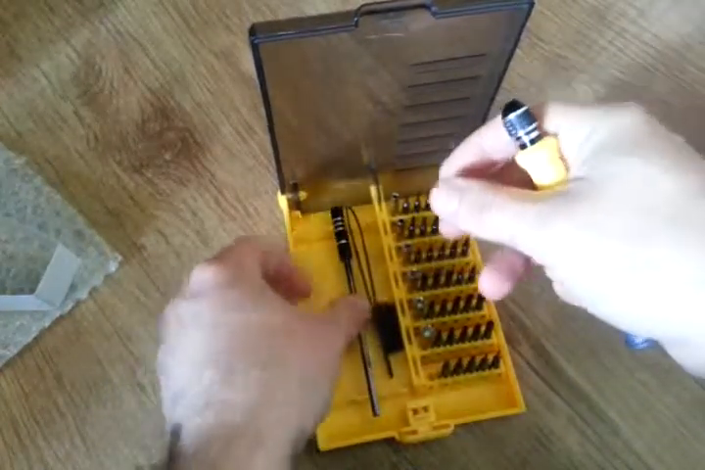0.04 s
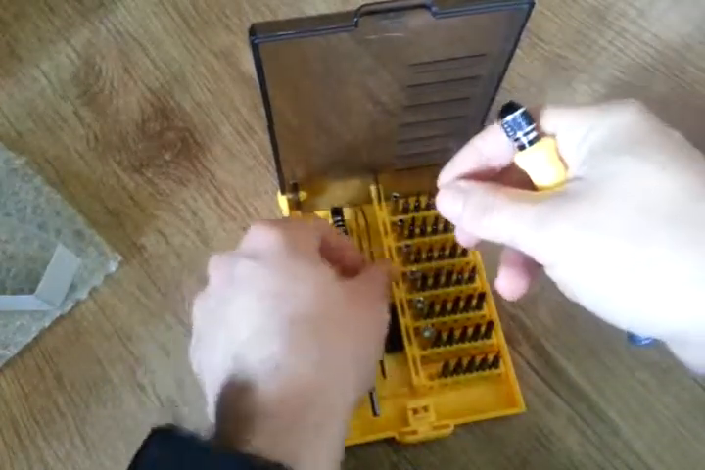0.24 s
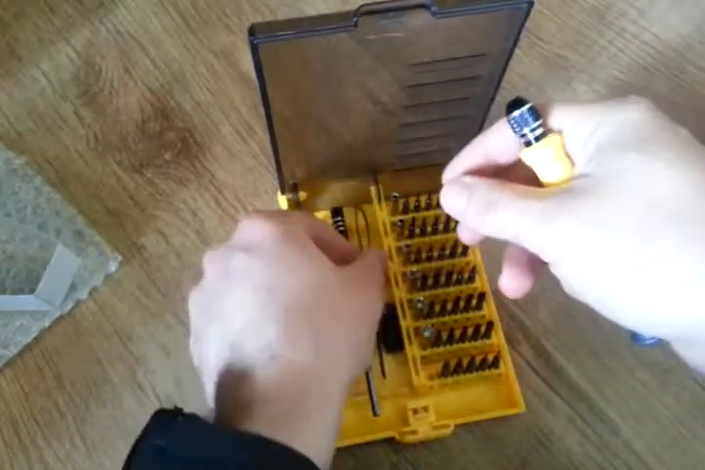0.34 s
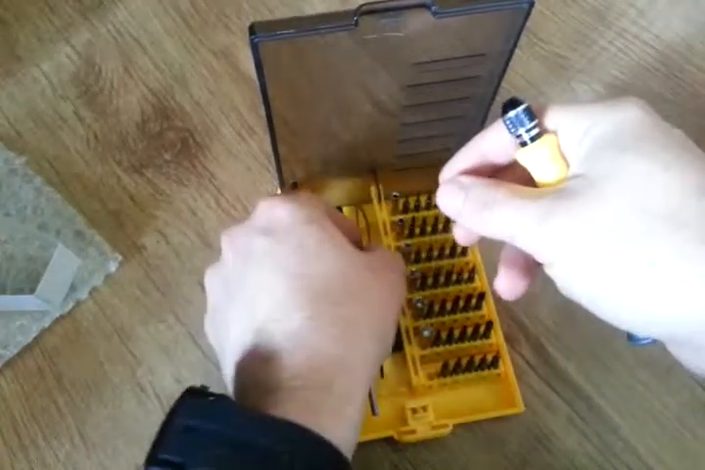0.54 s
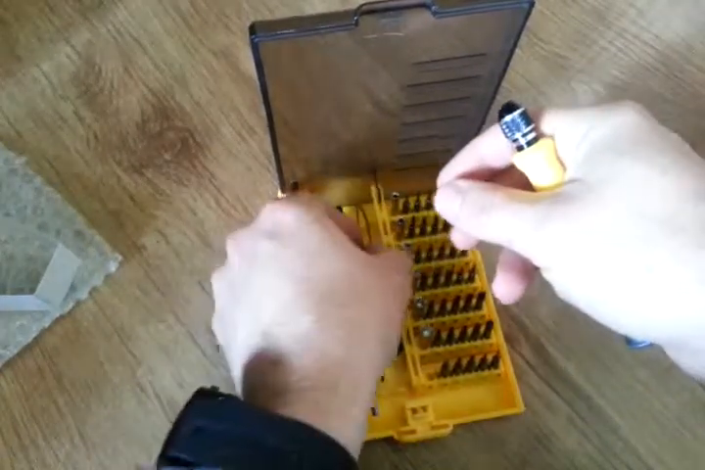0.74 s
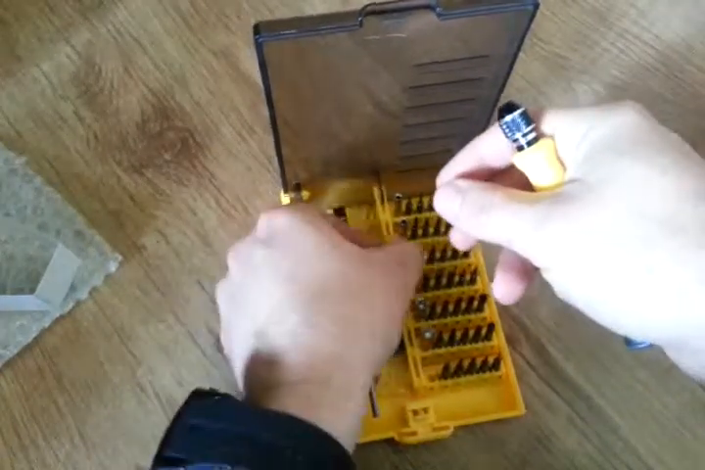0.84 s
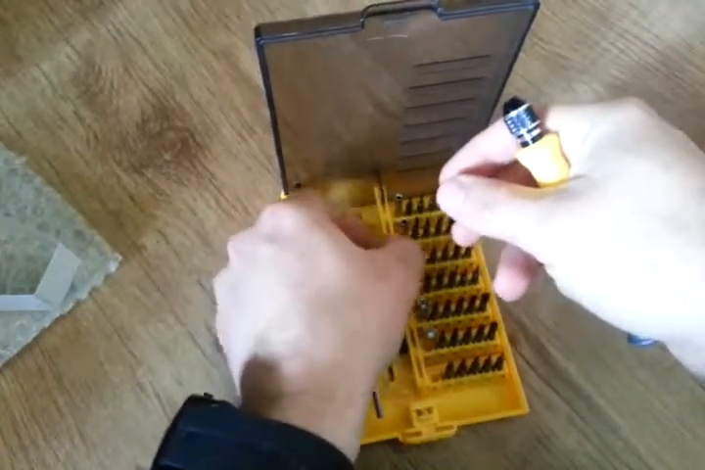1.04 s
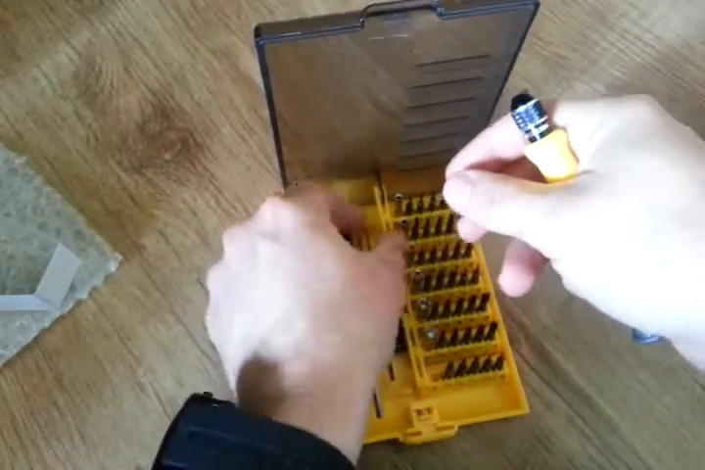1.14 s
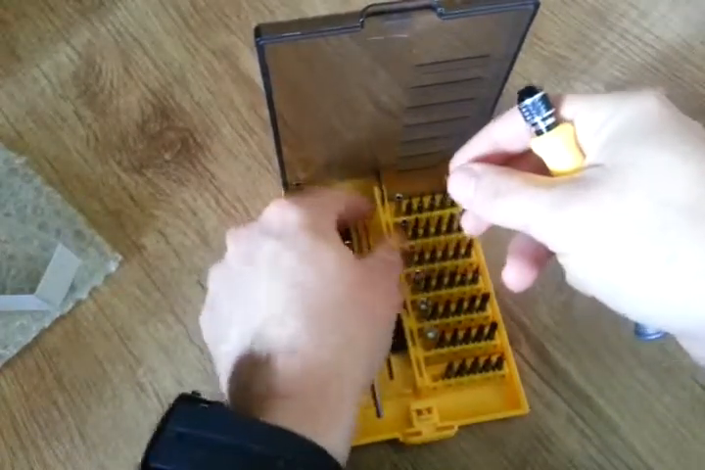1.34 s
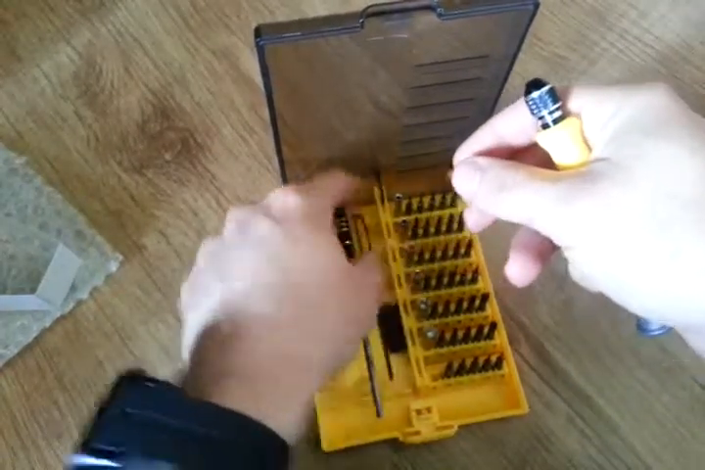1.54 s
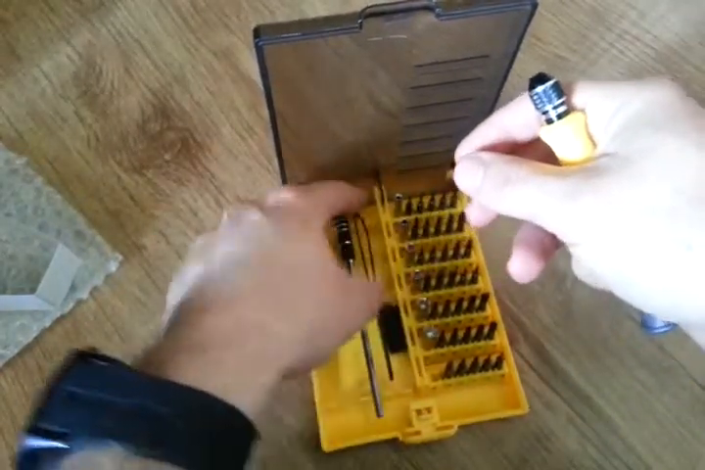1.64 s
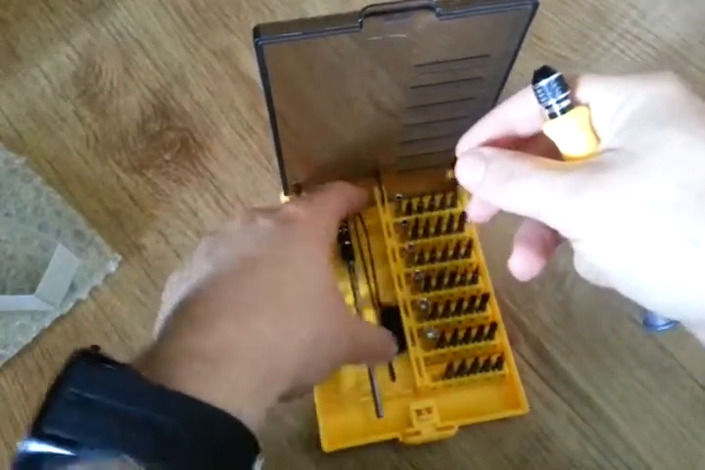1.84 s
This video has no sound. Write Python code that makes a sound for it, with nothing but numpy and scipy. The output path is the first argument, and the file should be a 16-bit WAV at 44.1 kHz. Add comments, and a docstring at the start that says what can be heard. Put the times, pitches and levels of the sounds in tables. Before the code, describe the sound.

Hard plastic clicks from a small steel tool being worked out of its case, close up. After near silence, a sharp double snap at 0.25 s, then light scrapes and small clicks until 0.8. The loudest clack comes at 0.88, followed by scattered snaps to 1.4. Squeaky rubs at 1.3 and 1.63, then soft scraping and faint dry camera ticks over quiet room hiss.

```python
"""In a quiet room, fingers work a steel bit holder out of a hard plastic case on a wooden table, close to a camera.
Parts click against the case: a short snap and crack, then ringing modes and a noisy rattle.
They scrape along it as dense random slips in the case's colour, at times singing as narrow bands of noise.
Faint dry sine ticks, probably the lens focusing, sound near the end over filtered-noise room tone and hiss."""
import sys
import numpy as np
from scipy import signal
from scipy.fft import rfft, irfft, next_fast_len
from scipy.io import wavfile
from scipy.ndimage import uniform_filter1d

SR = 44100
rng = np.random.default_rng(int(sys.argv[2]) if len(sys.argv) > 2 else 0)


def store_pcm(level_fs):
    """Save levels as 16-bit WAV."""
    pcm = np.round(np.clip(level_fs, -1, 1) * 32767).astype(np.int16)
    wavfile.write(sys.argv[1], SR, np.atleast_2d(pcm).T)


N = 83790

# ringing modes of the plastic case: mode_hz [Hz], level_db [dB], t60_s [s]
CASE_MODES = [(275, 0, .1), (410, -1, .07), (716, -3, .07), (901, -4, .07), (1225, -3, .06),
              (1423, -5, .06), (1625, -5, .06), (1953, -5, .06), (2124, -4, .06), (2480, -5, .06),
              (2824, -4, .06), (3330, -5, .06), (3750, -7, .06), (4450, -3, .05)]
# broad colour that the case radiates: freq_hz [Hz], level_db [dB]
CASE_COLOUR = [(100, -45), (190, -24), (270, 0), (330, -3), (650, 2), (1200, -3), (1700, -5), (2700, -4),
               (4700, -2), (5600, -7), (9500, -13), (11000, -21), (14500, -22)]


def amp(db):
    """dB to gain."""
    return 10 ** (np.asarray(db) / 20)


def unit(x):
    """Scaled to rms 1."""
    return x / np.sqrt(np.mean(x ** 2) + 1e-20)


def along(points, hz):
    """Values between (Hz, value) points, on a log frequency axis."""
    point_hz, values = np.transpose(points)
    return np.interp(np.log(hz + 1), np.log(point_hz + 1), values)


def filtered(x, response):
    """x with its spectrum multiplied by a response of frequency."""
    length = x.shape[-1]
    padded = next_fast_len(length + 4096)
    spectrum = rfft(x, padded) * response(np.fft.rfftfreq(padded, 1 / SR))
    return irfft(spectrum, padded)[..., :length]


def add(out, start_s, x):
    """Mix x in at a time."""
    start = max(round(start_s * SR), 0)
    out[:, start:start + x.shape[-1]] += x[:, :N - start]


def wide(pair):
    """One sound at two ports: a shared part, and a part of opposite sign that grows with frequency."""
    # unshared over shared part: freq_hz [Hz], ratio [gain]
    spread = [(250, .15), (600, .3), (1200, .55), (3000, .6), (12000, 1.1)]
    side = filtered(pair[1], lambda hz: along(spread, hz))
    return np.array([pair[0] + side, pair[0] - side])


def shelf_db(hz, bass_db, treble_db):
    """How much more or less a contact excites the low and the high end."""
    bass_hz, treble_hz = 900, 5500
    bass = bass_db / (1 + (hz / bass_hz) ** 4)
    treble = treble_db / (1 + (treble_hz / (hz + 1)) ** 6)
    return bass + treble


def peak_db(hz, centre_hz, height_db):
    """A bell-shaped boost on a log frequency axis."""
    width = .22  # in natural-log frequency
    return height_db * np.exp(-(np.log((hz + 1) / centre_hz) / width) ** 2)


def air():
    """Room tone and microphone hiss: coloured noise, more alike left and right in some bands than others."""
    # colour of the air: freq_hz [Hz], level_db [dB]
    air_colour = [(20, -23), (60, -11), (150, -2), (200, -2), (280, -5), (420, -5), (700, -11), (1500, -14),
                  (4500, -17), (6200, -22), (10000, -20), (14500, -20)]
    # left-right likeness: freq_hz [Hz], correlation [-1 to 1]
    likeness = [(60, .1), (300, .4), (1000, .2), (5000, .02)]
    mid_db, hiss_top_hz = -58, 14600

    def mid_side_response(hz):
        turn = np.arccos(np.clip(along(likeness, hz), -1, 1)) / 2
        colour = amp(along(air_colour, hz)) * (hz < hiss_top_hz)
        return colour * [np.cos(turn), np.sin(turn)]

    mid, side = filtered(rng.standard_normal((2, N)), mid_side_response)
    return amp(mid_db) * np.array([mid + side, mid - side]) / np.std(mid)


def room(x):
    """Reverberation as decaying noise: each frequency of the room's answer dies at its own speed."""
    # reverberation time: freq_hz [Hz], t60_s [s]
    room_t60 = [(200, .4), (1400, .3), (4000, .28), (10000, .22)]
    hz, t, grid = signal.stft(rng.standard_normal((2, SR // 2)), SR, nperseg=256)
    decay = amp(-60 * t / along(room_t60, hz)[:, None])
    tail = signal.istft(grid * decay, SR, nperseg=256)[1]
    tail = tail / np.linalg.norm(tail[0])
    delayed = np.pad(x.mean(axis=0), (200, 0))[None]  # pre-delay in samples
    return signal.fftconvolve(delayed, tail, axes=1)[:, :N]


def lens():
    """Tiny dry ticks, each a fast-dying sine, louder at the right port."""
    # ticks: start_s [s], level_db [dB, midway between the ports]
    ticks = [(1.5454, -44), (1.5788, -43), (1.6791, -42), (1.7449, -48), (1.7779, -49), (1.8113, -45),
             (1.8457, -40)]
    tick_hz, t60_s, right_over_left_db = 3200, .006, 4
    out, t = np.zeros((2, N)), np.arange(SR // 50) / SR
    pan = amp([[-right_over_left_db / 2], [right_over_left_db / 2]])
    for start_s, level_db in ticks:
        tick = amp(level_db - 60 * t / t60_s) * np.sin(2 * np.pi * tick_hz * t)
        add(out, start_s, tick * pan)
    return out


def sings():
    """A rubbed bit sings on one resonance: narrow noise, swelling and fading."""
    # sung notes: peak_s [s], level_db [dB rms at the peak], fall_s [s per 20 dB], pitch_hz [Hz]
    sung_notes = [(1.321, -45, .03, 1870), (1.322, -43, .02, 3350), (1.331, -45, .03, 3700),
                  (1.630, -37, .015, 3760), (1.637, -42, .02, 1400)]
    width_hz, rise_s = 300, .007  # width at half amplitude, time for a 20 dB rise
    out, t = np.zeros((2, N)), np.arange(-SR // 10, SR // 10) / SR
    for peak_s, level_db, fall_s, pitch_hz in sung_notes:
        noise = rng.standard_normal((2, len(t)))
        tone = filtered(noise, lambda hz: 1 / (1 + (2 * (hz - pitch_hz) / width_hz) ** 2))
        swell = amp(level_db - 20 * np.maximum(-t / rise_s, t / fall_s))
        add(out, peak_s + t[0], swell * wide(unit(tone)))
    return out


def rub_colour(hz, centre_hz, bass_db, treble_db):
    """The case's colour and modes, with a broad peak where the rubbing is centred."""
    modes_db = 8
    # shorter ringing means a broader resonance
    modes = sum(amp(level_db) / (1 + ((hz - mode_hz) * t60_s / 3) ** 2)
                for mode_hz, level_db, t60_s in CASE_MODES)
    colour_db = along(CASE_COLOUR, hz) + peak_db(hz, centre_hz, 7) + shelf_db(hz, bass_db, treble_db)
    return amp(colour_db) * (1 + amp(modes_db) * modes)


def scrapes():
    """Dense slips of uneven size through the case's colour, swelling and fading."""
    # scrapes: peak_s [s], level_db [dB rms at the peak], rise_s and fall_s [s per 20 dB],
    # centre_hz [Hz], bass_db [dB], treble_db [dB]
    strokes = [(.315, -46, .06, .06, 2500, 0, -3), (.44, -43, .03, .06, 3100, 8, -6),
               (.463, -38, .04, .04, 3500, 7, -6), (.525, -47, .04, .08, 3000, 4, -3),
               (.556, -41, .025, .05, 1500, 0, 0), (.715, -52, .06, .05, 1800, 9, -6),
               (.76, -41, .012, .05, 2600, 3, -3), (.795, -41, .03, .03, 2500, -2, 8),
               (.83, -48, .05, .08, 3000, 0, -3), (1.255, -44, .04, .045, 3500, 2, 3),
               (1.321, -37, .005, .025, 4300, -3, 6), (1.45, -49, .06, .06, 2700, -2, -3),
               (1.495, -49, .04, .06, 2200, 5, -3), (1.613, -47, .06, .03, 3500, -2, 0),
               (1.629, -36, .012, .04, 5200, -6, -1), (1.716, -48, .025, .025, 6500, -6, 8),
               (1.79, -55, .15, .15, 3000, 8, 0), (1.885, -48, .03, .04, 3000, 6, -3)]
    slips_per_s, slip_spread_db = 12000, 2
    uneven_db, uneven_s = 2, .004  # wander of the slip size and its smoothing time
    out, t = np.zeros((2, N)), np.arange(-SR // 5, SR // 5) / SR
    for peak_s, level_db, rise_s, fall_s, centre_hz, bass_db, treble_db in strokes:
        slips = rng.random(len(t)) < slips_per_s / SR
        sizes = amp(slip_spread_db * rng.standard_normal(len(t)))
        wander = unit(uniform_filter1d(rng.standard_normal(len(t)), round(uneven_s * SR)))
        grains = slips * sizes * amp(uneven_db * wander) * rng.standard_normal((2, len(t)))
        rub = filtered(grains, lambda hz: rub_colour(hz, centre_hz, bass_db, treble_db))
        swell = amp(level_db - 20 * np.maximum(-t / rise_s, t / fall_s))
        add(out, peak_s + t[0], swell * wide(unit(rub)))
    return out


def case_ring(t, bass_db, treble_db):
    """Decaying sines at the case's modes, struck at random strengths and phases at each port."""
    rise_cycles, scatter_db = .7, 3
    hz, level_db, t60_s = np.transpose(CASE_MODES)[:, :, None]
    shape = (2, len(CASE_MODES), 1)
    gains_db = level_db + scatter_db * rng.standard_normal(shape) + shelf_db(hz, bass_db, treble_db)
    phase = 2 * np.pi * rng.random(shape)
    envelope = amp(gains_db - 60 * t / t60_s) * (1 - np.exp(-t * hz / rise_cycles))
    return np.sum(envelope * np.sin(2 * np.pi * hz * t + phase), axis=1)


def case_noise(t, snap_hz, bass_db, treble_db):
    """Steady noise in the case's colour, strongest near the snap's pitch, for the rattle and crack."""
    noise = filtered(rng.standard_normal((2, len(t))),
                     lambda hz: amp(along(CASE_COLOUR, hz) + peak_db(hz, snap_hz, 4)))
    return filtered(unit(noise), lambda hz: amp(shelf_db(hz, bass_db, treble_db)))


def clicks():
    """A short snap and crack, then the modes of the case and its dense rattle dying away."""
    # clicks: start_s [s], level_db [dB, whole click], snap_hz [Hz], rise_cycles [cycles of the snap],
    # bass_db [dB], treble_db [dB], ring_db [dB, modes and rattle within the click]
    knocks = [(.227, -41, 600, 1.5, 8, -6, -8), (.2425, -11, 4550, 6, -3, 1, -13),
              (.2427, -9, 2150, 1.6, -4, -3, -15), (.244, -17, 650, .8, -3, -2, -12),
              (.2468, -13, 4600, 5, -3, -1, -12), (.2495, -19, 3020, 5, 0, -2, -10),
              (.338, -40, 2730, 2, 0, -4, -8), (.4225, -27, 1700, .6, 0, -12, -14),
              (.4655, -26, 2300, 1.5, 5, -4, -11), (.562, -25, 3100, 1, 0, 0, -11),
              (.7675, -32, 2500, 1, -2, -4, -14), (.8815, -11, 4000, 2, -5, -9, -13),
              (.8817, -7, 2500, 1.1, -6, -10, -15), (.9065, -17, 1900, .6, -4, -8, -10),
              (1.0332, -31, 3190, 6, -2, -10, -12), (1.0335, -33, 2350, 4, 0, -10, -14),
              (1.0443, -17, 2400, .8, 1, -1, -15), (1.0495, -28, 5000, 5, -2, 0, -10),
              (1.1128, -38, 2300, 1.5, -4, -8, -14), (1.1155, -15, 2700, 1.8, -8, -3, -22),
              (1.133, -20, 4900, 2, 3, 2, -14), (1.213, -13, 2410, .9, 1, -1, -18),
              (1.218, -26, 4600, 2, 0, 2, -12), (1.383, -21, 2300, 1, 3, -3, -16),
              (1.550, -33, 1350, .7, 3, -8, -14), (1.5505, -36, 285, 1, 0, -10, -20),
              (1.837, -42, 550, .7, 4, -10, -16), (1.8725, -31, 2360, 1.3, 2, -8, -13)]
    snap_db, modes_db, crack_db = -1.5, -9, -14
    rattle_t60_s, crack_t60_s, onset_s = .075, .012, .0004
    out, t = np.zeros((2, N)), np.arange(SR // 4) / SR
    for start_s, level_db, snap_hz, rise_cycles, bass_db, treble_db, ring_db in knocks:
        rise = t * snap_hz / rise_cycles
        snap = amp(snap_db) * (rise * np.exp(1 - rise)) ** 2 * np.sin(2 * np.pi * snap_hz * t)
        ring = case_ring(t, bass_db, treble_db)
        noise = case_noise(t, snap_hz, bass_db, treble_db)
        rattle = noise * amp(-60 * t / rattle_t60_s)
        crack = noise * amp(crack_db - 60 * t / crack_t60_s)
        body = amp(ring_db) * (amp(modes_db) * ring + rattle) + crack
        body *= 1 - np.exp(-t / onset_s)
        add(out, start_s, amp(level_db) * (snap + wide(body)))
    return filtered(out, lambda hz: 1 / (1 + (210 / (hz + 1)) ** 4))  # low cut


def scene():
    """The case lies a little to the right, by level and arrival time, with room, lens and air around it."""
    # left over right level: freq_hz [Hz], difference_db [dB]
    lean = [(250, -1), (1000, .4), (4000, -.3), (12000, -3.5)]
    left_lag_s, room_db = 6e-5, -15
    near = clicks() + scrapes() + sings()
    side = np.array([[1], [-1]])  # left, right

    def placement(hz):
        level = amp(side * along(lean, hz) / 2)
        return level * np.exp(-1j * np.pi * side * hz * left_lag_s)

    return filtered(near, placement) + amp(room_db) * room(near) + lens() + air()


def record(dry):
    """The camera rolls off at the top and keeps nothing above its band limit."""
    # roll-off at the top: freq_hz [Hz], level_db [dB]
    roll_off = [(14400, 0), (15000, -28), (16000, -45)]
    top_hz = 16000
    return filtered(dry, lambda hz: amp(along(roll_off, hz)) * (hz < top_hz))


dry = scene()
out = record(dry)
store_pcm(out)
```